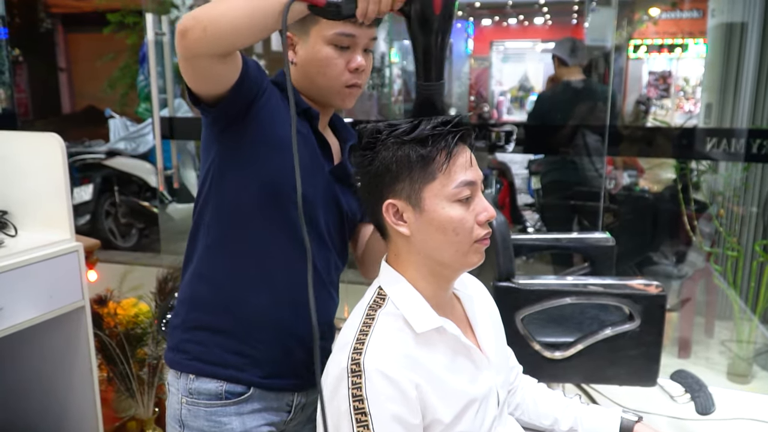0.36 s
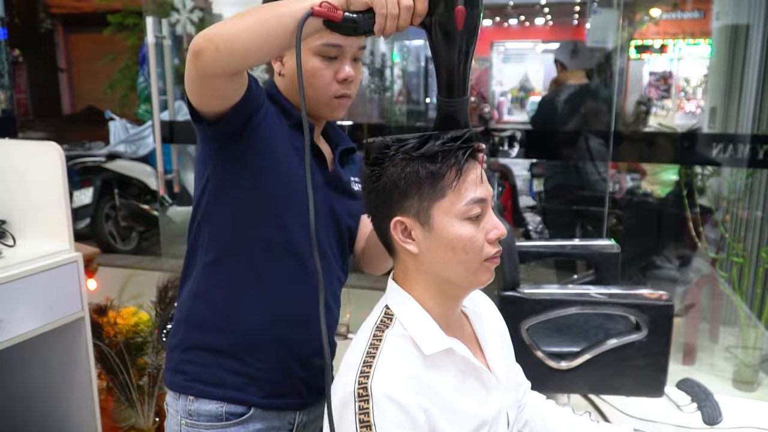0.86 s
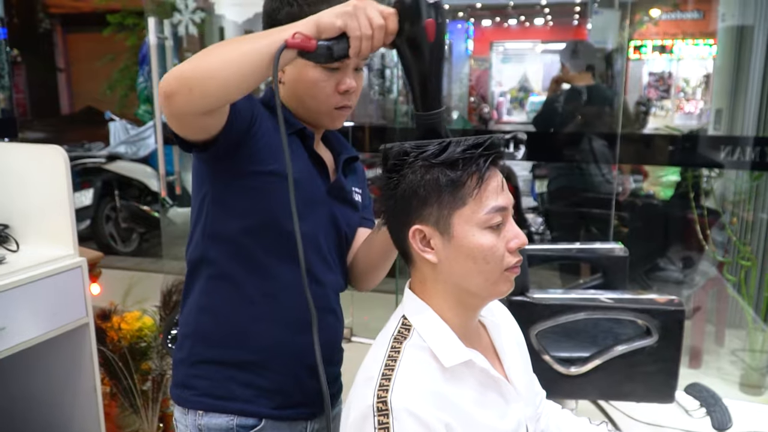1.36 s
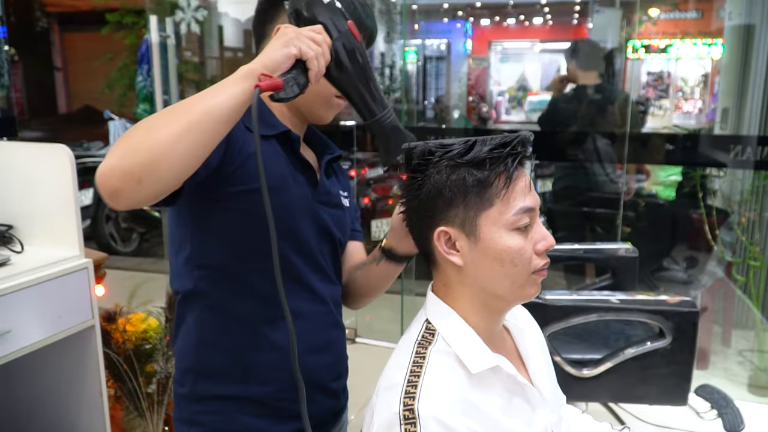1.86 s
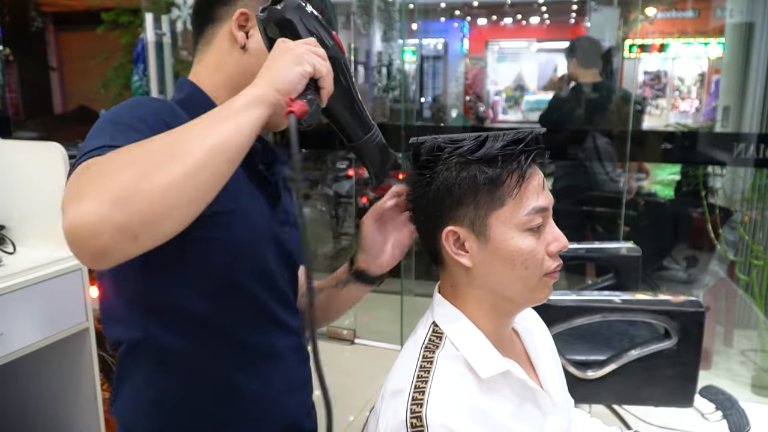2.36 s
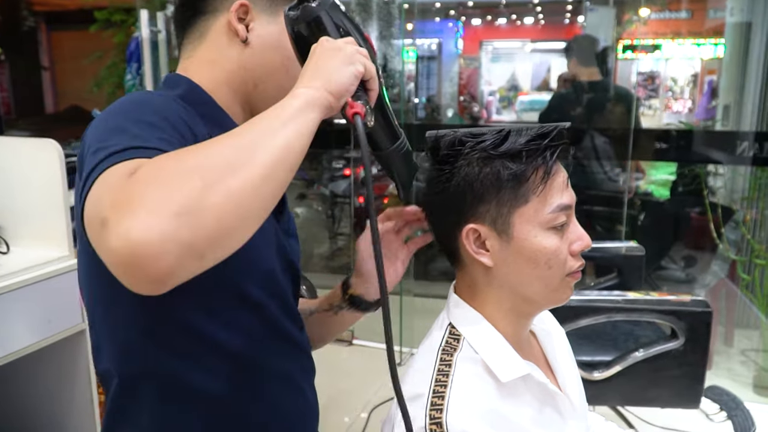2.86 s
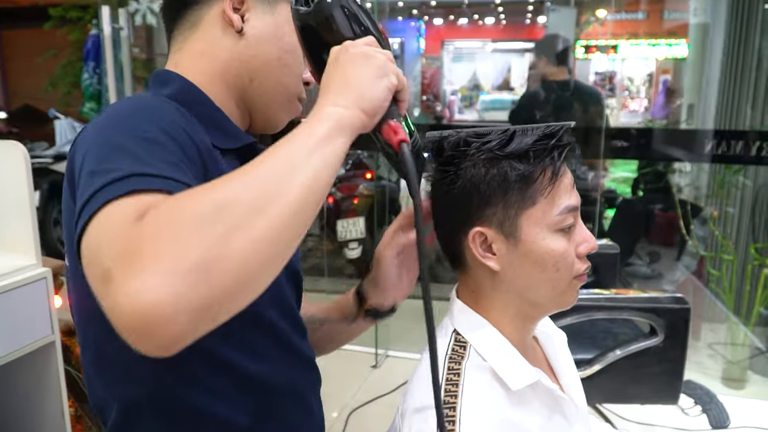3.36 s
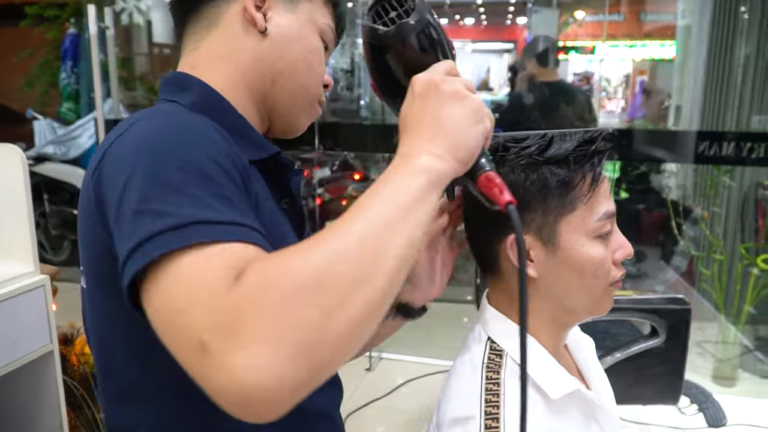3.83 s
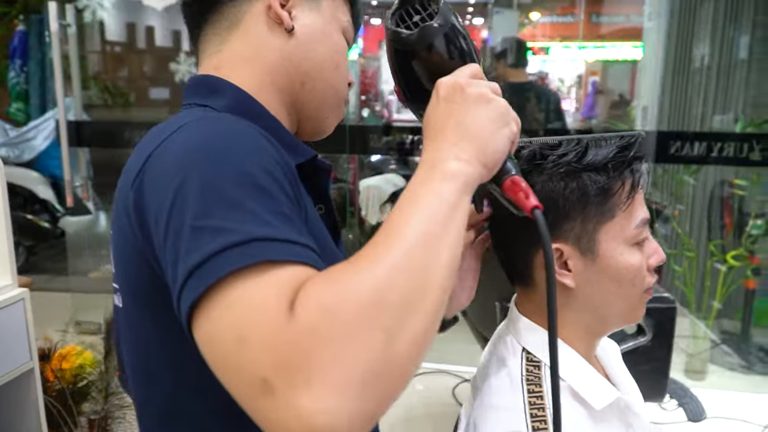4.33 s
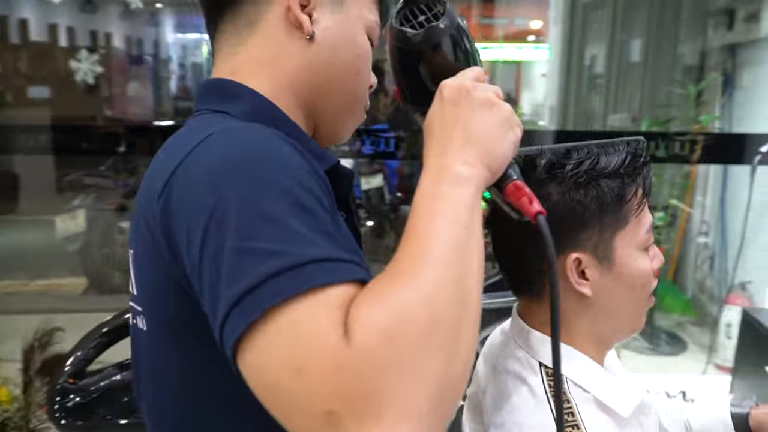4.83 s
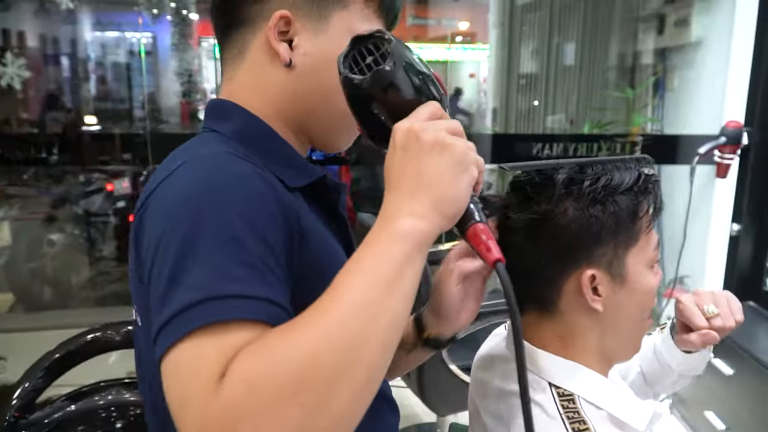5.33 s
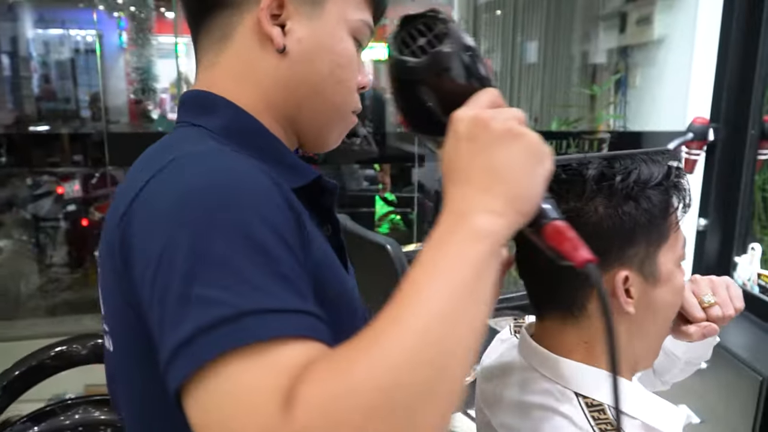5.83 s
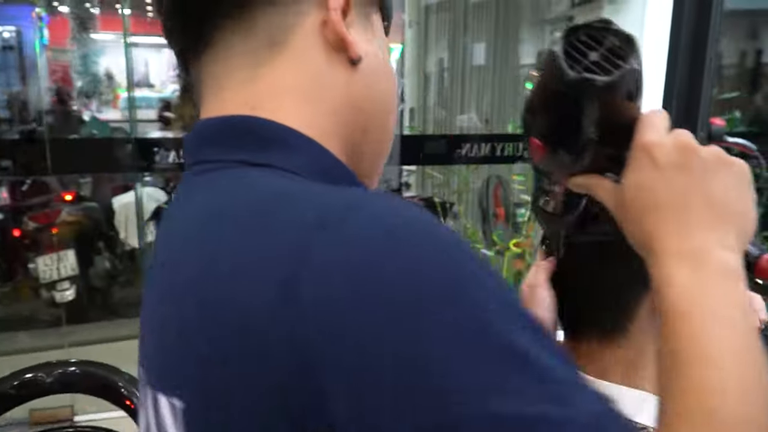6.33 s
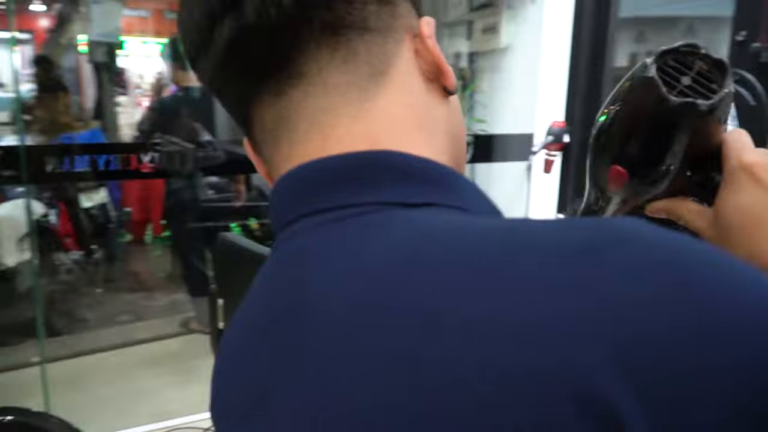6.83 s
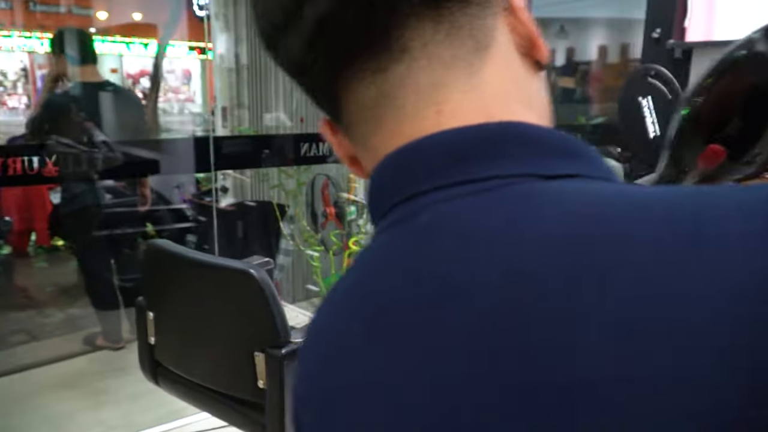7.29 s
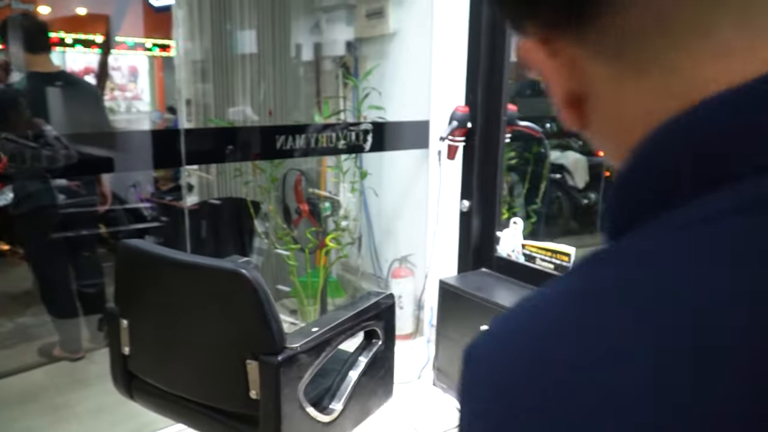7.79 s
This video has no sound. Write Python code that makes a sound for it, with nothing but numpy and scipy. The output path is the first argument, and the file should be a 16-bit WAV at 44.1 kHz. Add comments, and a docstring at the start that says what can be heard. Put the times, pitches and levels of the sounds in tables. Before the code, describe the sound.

Continuous close hair dryer roar with airy hiss and drifting whistly tones, growing louder then sliding right, plus a small steel clink near the start.

```python
"""A handheld hair dryer blows in a small tiled shop, comes nearer, then passes to the right of a close microphone pair.
Its rush is noise shaped by the barrel's pipe modes, with jet and grille hiss above and drifting modes that sing.
The shop returns it as reverberation, nearly mono in the low mids and widest around 1.5-3 kHz; the motor adds
faint tones. Two wavering hums and a traffic rumble come in from the street; decaying sines make one clink of a
steel tool."""
import sys
import numpy as np
from scipy import signal
from scipy.io import wavfile
from scipy.ndimage import uniform_filter1d, map_coordinates

SR = 44100
rng = np.random.default_rng(int(sys.argv[2]) if len(sys.argv) > 2 else 0)


def boost(x):
    """Linear amplitude factor 10**(x/20) for a level x in decibels (scalar or array-like)."""
    u = np.asarray(x, float) / 20
    return 10 ** u


def unload_wav(signal):
    """Save mono or channel-first audio to the path in sys.argv[1] as 16-bit WAV at rate SR, clipped to [-1, 1]."""
    wavfile.write(
        sys.argv[1],
        SR,
        np.round(np.clip(np.atleast_2d(signal).T, -1, 1) * 32767).astype(np.int16),
    )


N = 360297  # length in samples
WINDOW = 2048  # samples in each short-time spectrum
TOP_HZ = 15730  # the grille hiss and the reverberation end here

# the dryer's direct sound, before the shading at the microphones: start_s, barrel_db, jet_db, grille_db
DRYER_LEVELS = [(0, -30, -30, -34.5), (.9, -28, -29.5, -33.5), (1.6, -30, -32, -35.5),
                (2.1, -29, -31.5, -37), (2.7, -26.5, -30.5, -33.5), (3.1, -27, -29, -31.5),
                (3.6, -27, -26.5, -28.5), (4.2, -25, -25.5, -28.5), (5.1, -27.5, -26, -28.5),
                (5.9, -25, -24.5, -28), (6.3, -24, -24, -29.5), (6.7, -26.5, -25, -31), (7, -28, -26, -31),
                (7.3, -27, -28, -29.5), (7.55, -27, -26.5, -27.5), (7.8, -26.5, -28, -28.5),
                (8.17, -28.5, -33, -34)]


def along(points, hz):
    """(Hz, value) points read on a log frequency axis."""
    point_hz, value = np.transpose(points)
    return np.interp(np.log(hz + 1), np.log(point_hz + 1), value)


def curves(rows, t):
    """Each column after the time, read at times t."""
    start_s, *columns = np.transpose(rows)
    return [np.interp(t, start_s, column) for column in columns]


def wobble(rate):
    """A smooth random curve through rate knots a second."""
    knots = rng.standard_normal(int(N * rate / SR) + 4)
    return map_coordinates(knots, [np.arange(N) * rate / SR])


def patches(shape, bins, frames):
    """A random field of spread 1, smoothed over so many bins and frames."""
    field = uniform_filter1d(rng.standard_normal(shape), size=bins, axis=0)
    field = uniform_filter1d(field, size=frames, axis=1)
    return field / field.std()


def noise(patchy_db, flutter_db):
    """Short-time spectrum of turbulence: quick flutter, broad patches and the fine ripple of wall echoes."""
    # depth of the echo ripple: pitch_hz, depth_db
    ripple_depth = [(200, 1.5), (500, 2), (1000, 2.5), (2500, 2.5), (5000, 1.5), (12000, 1)]
    hiss = boost(flutter_db * wobble(30)) * rng.standard_normal(N)
    hz, t, spectrum = signal.stft(hiss, SR, nperseg=WINDOW)
    broad_db = patchy_db * patches(spectrum.shape, bins=9, frames=14)
    # echoes interfere: narrow peaks that shift with time
    ripple_db = along(ripple_depth, hz)[:, None] * patches(spectrum.shape, bins=1, frames=18)
    spectrum = spectrum * boost(broad_db + ripple_db)
    return hz[:, None], t, spectrum / np.sqrt(np.mean(abs(spectrum) ** 2))


def to_sound(spectrum):
    """Waveform of a short-time spectrum, trimmed to the scene's length."""
    return signal.istft(spectrum, SR, nperseg=WINDOW)[1][..., :N]


def peak(hz, centre_hz, width_hz):
    """Power response of one resonance, 1 at its centre."""
    return 1 / (1 + ((hz * hz - centre_hz ** 2) / (hz * width_hz + 1)) ** 2)


def level(power, db):
    """Gain that gives the noise this power spectrum at the rms level db."""
    # 3/4 is the share of the noise power that the windowed spectrum shows
    return boost(db) * np.sqrt(power / power.sum(axis=0) * 3 / 4)


def barrel(hz):
    """Power gain of the barrel's pipe modes on top of a flat rush."""
    # pipe modes: centre_hz, width_hz, over_rush_db
    pipe_modes = [(450, 190, -14.5), (1310, 210, -2.5), (1480, 140, -6), (2110, 240, -2.5), (2650, 100, -3),
                  (3290, 110, -2.5), (3900, 200, -8), (4450, 220, -4), (4950, 250, -19), (5960, 870, -1),
                  (9900, 600, -16)]
    return 1 + sum(boost(2 * db) * peak(hz, centre, width) for centre, width, db in pipe_modes)


def hollow(hz, t):
    """Gain of each microphone: as the dryer moves off, a hollow sweeps down at the right one and its top dulls."""
    # the right microphone's losses: start_s, hollow_hz, depth_db, top_lost_db
    right_losses = [(7.2, 10300, 0, 0), (7.4, 10100, 3, 2), (7.5, 9900, 7, 2.5), (7.6, 9600, 7, 3),
                    (7.75, 8900, 6, 3), (7.95, 8700, 4, 3), (8.17, 8500, 3, 3)]
    # where the top dulls: pitch_hz, share of the loss
    top_share = [(13000, 0), (15500, 1)]
    centre_hz, depth_db, top_db = curves(right_losses, t)
    lost_db = depth_db * peak(hz, centre_hz, width_hz=1700) + top_db * along(top_share, hz)
    return boost([0 * lost_db, -lost_db])


def modes(hz, widths_hz, columns):
    """Gains of drifting resonances, whose columns alternate centre Hz and level dB."""
    return [level(peak(hz, centre, width) ** 2, db)
            for width, centre, db in zip(widths_hz, columns[::2], columns[1::2])]


def dryer_gain(hz, t, lag_us):
    """Four rushes, of roar, body, jet and grille, and the singing modes, summed as powers."""
    # spectra of the four rushes (all but the grille then pass the barrel): pitch_hz, density_db per Hz
    roar_spectrum = [(30, -90), (100, -45), (170, -22.5), (250, -7), (310, -2.5), (400, -0.5), (700, -1.5),
                     (1000, -7.5), (1500, -60)]
    body_spectrum = [(500, -44), (750, -4), (1100, -0.5), (1500, -1.5), (1800, -5.5), (2150, -1.5),
                     (2500, -3.5), (3400, -5.5), (4500, -11.5), (6000, -58)]
    jet_spectrum = [(2500, -42), (3400, -6), (4500, 1.5), (6000, -0.5), (8500, 1.5), (10000, 0),
                    (12000, -34), (14000, -50)]
    grille_spectrum = [(7000, -38), (9500, -3), (11000, 1), (13000, -0.5), (15000, 0.5), (16500, -6)]
    # level of the low roar: start_s, level_db
    roar_level = [(0, -37.5), (1, -36.5), (1.7, -37.5), (2.7, -34.5), (4.3, -35.5), (5, -34.5),
                  (6.3, -32.5), (6.9, -33), (8.17, -35.5)]
    # three modes drift and swell as the mouth nears the hair: start_s, then pitch_hz, level_db of each
    singers = [(0, 475, -42, 1055, -48, 2700, -43), (1, 490, -37.5, 1055, -40, 2700, -44),
               (1.8, 473, -45.5, 1140, -40, 2740, -39), (2.6, 423, -39.5, 1095, -43, 2770, -42),
               (3.4, 420, -42, 1040, -37, 2720, -43), (4.2, 420, -48, 990, -43, 2720, -38),
               (5, 416, -33, 1010, -37, 2700, -34), (5.7, 415, -43, 1010, -39, 2700, -39),
               (6.3, 414, -44, 1005, -38, 2830, -35), (6.7, 418, -40, 1000, -33.5, 2720, -35),
               (7.2, 444, -40, 990, -37, 2770, -33), (7.6, 468, -39.5, 1030, -34, 2900, -35),
               (8.17, 453, -32.5, 1014, -36, 2900, -35)]
    # width_hz of each drifting mode, before its response is squared
    singer_widths = (32, 60, 520)
    # two barrel modes whistle as the mouth turns, the gap between them fills: start_s, then pitch_hz, level_db
    whistlers = [(0, 1520, -36, 1820, -39, 2130, -33), (.6, 1520, -36, 1820, -40, 2130, -37.5),
                 (.9, 1500, -39, 1840, -39, 2170, -35), (1.7, 1510, -35.5, 1810, -42, 2150, -37),
                 (2.4, 1540, -35, 1840, -40, 2130, -34), (3.1, 1510, -47, 1790, -40, 2170, -42),
                 (3.5, 1590, -35, 1820, -42, 2150, -37), (3.8, 1570, -31, 1820, -45, 2180, -31.5),
                 (4.2, 1480, -35.5, 1820, -48, 2150, -32.5), (4.55, 1510, -32, 1820, -48, 2200, -30),
                 (4.9, 1520, -30, 1820, -48, 2130, -35.5), (5.2, 1510, -31.5, 1820, -42, 2110, -32),
                 (5.55, 1550, -32.5, 1820, -34, 2110, -33), (5.9, 1520, -32, 1830, -36, 2190, -30.5),
                 (6.3, 1480, -30, 1820, -50, 2200, -39), (6.9, 1520, -34, 1830, -35, 2160, -34),
                 (7.3, 1500, -36, 1780, -38, 2170, -35), (7.8, 1510, -32.5, 1800, -37, 2130, -39),
                 (8.17, 1480, -34, 1820, -45, 2240, -42)]
    # width_hz of each whistling mode and of the gap, before the response is squared
    whistler_widths = (174, 340, 186)
    # three middle modes that swell with the mouth close to the head: pitch_hz, width_hz before squaring
    close_modes = [(1115, 45), (1212, 55), (1410, 130)]
    # their levels: start_s, then level_db of each
    close_levels = [(0, -52, -52, -44), (3.9, -52, -50, -47), (4.5, -52, -48, -35), (5, -50, -48, -30),
                    (5.4, -43, -41, -44), (5.8, -42, -41, -40), (6.2, -42, -37, -35), (6.45, -44, -45, -32),
                    (6.8, -52, -50, -42), (8.17, -52, -48, -42)]

    body_db, jet_db, grille_db = curves(DRYER_LEVELS, t)
    roar_db, = curves(roar_level, t)
    # the jet's hump climbs as the dryer passes to the side: 50 Hz a microsecond of lag
    hump_hz = np.minimum(6540 + 50 * lag_us, 7800)
    hump = 1 + boost(2 * 1.5) * peak(hz, hump_hz, width_hz=950)
    layers = [level(boost(2 * along(roar_spectrum, hz)) * barrel(hz), roar_db),
              level(boost(2 * along(body_spectrum, hz)) * barrel(hz), body_db),
              level(boost(2 * along(jet_spectrum, hz)) * barrel(hz) * hump, jet_db),
              level(boost(2 * along(grille_spectrum, hz)) * (hz < TOP_HZ), grille_db)]
    layers += modes(hz, singer_widths, curves(singers, t))
    layers += modes(hz, whistler_widths, curves(whistlers, t))
    layers += [level(peak(hz, centre, width) ** 2, db)
               for (centre, width), db in zip(close_modes, curves(close_levels, t))]
    return np.sqrt(sum(gain * gain for gain in layers))


def dryer():
    """Direct sound: one turbulent noise through the dryer's gain, shaded and delayed by its bearing."""
    # bearing, as extra path to the left microphone: start_s, lag_us
    bearing = [(0, 6), (.9, 8), (1.75, 2), (2.4, -1), (3.5, 0), (4.7, 6), (5.3, 2), (5.8, 3), (6.15, 12),
               (6.5, 22), (7, 34), (7.3, 36), (7.55, 53), (7.8, 58), (8.17, 66)]
    # shading of the left side: pitch_hz, left over right ahead_db, loss_db per microsecond,
    # turn_us (lag around which the loss turns back)
    shading = [(200, 0.5, 0.01, 110), (1520, -2, 0.07, 78), (4100, 2, 0.434, 66), (6000, 2.5, 0.2944, 67),
               (7500, -0.5, 0.4662, 51), (9300, 0.5, .5, 53), (11300, -0.5, 0.4, 51), (13500, 2, 0.57, 37),
               (15500, -6.5, 0.46, 41)]
    # share of the extra path that each wave feels: pitch_hz, share
    path_share = [(3000, 1.2), (5000, 0.92), (7500, 1.3), (10000, 1.23), (15000, 1)]

    hz, t, turbulence = noise(patchy_db=.6, flutter_db=.35)
    lag_us, = curves(bearing, t)
    # long waves bend round the microphone body, short ones are shaded
    shade_hz, *columns = np.transpose(shading)
    ahead_db, loss, turn_us = [along(np.transpose([shade_hz, column]), hz) for column in columns]
    pan_db = ahead_db - loss * lag_us / (1 + abs(lag_us / turn_us) ** 3.9)
    lag_s = lag_us / 10 ** 6 * along(path_share, hz)
    # half the difference goes to each side
    left = boost(pan_db / 2) * np.exp(-1j * np.pi * hz * lag_s)
    sides = np.array([left, 1 / left])
    return to_sound(dryer_gain(hz, t, lag_us) * turbulence * hollow(hz, t) * sides)


def shop():
    """The dryer's reverberation: nearly mono in the low mids, widest around 1.5-3 kHz, more alike again on top."""
    # spectrum before the barrel: pitch_hz, density_db per Hz
    shop_spectrum = [(30, -90), (100, -40), (170, -36), (300, -6.5), (500, -2), (1000, 2), (2000, -1.5),
                     (4000, -3.5), (8000, -3.5), (12000, -7), (16000, -11)]
    # likeness of the two microphones: pitch_hz, left-right correlation
    likeness = [(100, 0.9), (300, 0.97), (700, 0.69), (1500, 0.15), (3000, 0.12), (7000, 0.29),
                (15000, 0.6)]
    # level, with a duller spell as the barber's back screens the pair: start_s, level_db, treble_lost_db
    shop_level = [(0, -27.5, 0.5), (2, -27.5, 1), (4, -27, -1), (6, -27.5, -0.5), (6.8, -27.5, 3),
                  (7.3, -26, 0), (7.55, -27.5, 1), (7.9, -27, 0), (8.17, -28, 1)]
    # where the treble is lost: pitch_hz, share of the loss
    screened = [(5000, 0), (8000, 1)]

    hz, t, first = noise(patchy_db=.8, flutter_db=.2)
    _, _, second = noise(patchy_db=.8, flutter_db=.2)
    # the mix of shared and opposed noise sets the correlation
    turn = np.arccos(np.clip(along(likeness, hz), -1, 1)) / 2
    mid, side = np.cos(turn) * first, np.sin(turn) * second
    shop_db, lost_db = curves(shop_level, t)
    power = boost(2 * along(shop_spectrum, hz)) * barrel(hz) * (hz < TOP_HZ)
    gain = level(power, shop_db - along(screened, hz) * lost_db)
    return to_sound(gain * hollow(hz, t) * np.array([mid + side, mid - side]))


def tone(hz, wander_hz, sway_db):
    """A sine of rms about 1, unsteady in pitch and level."""
    sway = boost(sway_db * wobble(6))
    phase = 2 * np.pi * np.cumsum(hz + wander_hz * wobble(6)) / SR
    return np.sqrt(2) * sway * np.sin(phase)


def nearness(t):
    """Barrel level over that at middle distance, dB."""
    middle_distance_db = -27
    return curves(DRYER_LEVELS, t)[0] - middle_distance_db


def motor():
    """Faint whine, louder as the dryer nears, and two housing tones; in phase, slightly louder at the right."""
    # whine, before nearness and the microphone gain: pitch_hz, level_db, wander_hz
    whine_tones = [(328, -55, 2), (419, -57, 2.5), (492, -53, 3), (995, -51, 3), (2952, -56, 3),
                   (3284, -55, 6)]
    # pitch_hz of the two housing tones
    housing_hz = (735, 779)
    # housing tones, before the microphone gain: start_s, lower_db, upper_db
    housing_levels = [(0, -47, -50), (.7, -45, -49), (1.1, -51, -48), (1.8, -56, -52), (2.3, -54, -47),
                      (3.2, -58, -46), (4.3, -58, -42.5), (4.9, -58, -44), (5.7, -58, -47), (6, -58, -41),
                      (6.4, -56, -41), (6.6, -54, -46), (6.9, -54, -44), (7.3, -54, -44), (7.7, -54, -50),
                      (8.17, -54, -48)]
    t = np.arange(N) / SR
    whine = sum(boost(db) * tone(hz, wander, sway_db=4.0) for hz, db, wander in whine_tones)
    housing = sum(boost(db) * tone(hz, wander_hz=1.2, sway_db=1.2)
                  for hz, db in zip(housing_hz, curves(housing_levels, t)))
    tones = boost(nearness(t) + 0.5) * whine + housing
    return tones * boost([[-.6], [.6]])  # left, right dB


def hums():
    """Two low wavering tones over the rumble of traffic, alike at both microphones."""
    # traffic rumble: pitch_hz, density_db per Hz
    rumble_spectrum = [(20, -30), (45, -21), (80, -4), (100, -2), (150, -2), (200, -12), (400, -50)]
    # street sounds swell and pass: start_s, lower_hum_db, upper_hum_db, rumble_db
    street_levels = [(0, -77, -77, -85), (1.5, -81, -81, -80), (1.9, -84, -84, -74), (3.3, -73, -73, -70),
                     (4.3, -73, -73, -65), (4.8, -67, -69, -62), (5.25, -59, -67, -63),
                     (5.7, -59.5, -61, -63), (5.85, -64, -58, -63), (6, -56, -57, -63),
                     (6.15, -68, -58, -63), (6.35, -70, -70, -63), (7.1, -67, -63, -64),
                     (7.3, -64, -72, -65), (7.5, -65, -58, -65), (7.7, -66, -67, -68),
                     (8.17, -75, -68, -63)]
    # pitch_hz of the two hums
    hum_hz = (99, 115.5)
    hz, t, turbulence = noise(patchy_db=2.0, flutter_db=3.5)
    rumble_db = curves(street_levels, t)[2]
    rumble = to_sound(level(boost(2 * along(rumble_spectrum, hz)), rumble_db) * turbulence)
    lower_db, upper_db, _ = curves(street_levels, np.arange(N) / SR)
    return rumble + sum(boost(db) * tone(pitch, wander_hz=1.4, sway_db=1)
                        for pitch, db in zip(hum_hz, (lower_db, upper_db)))


def clink():
    """Each touch of the steel stops the old ring and starts the modes anew; it comes from the left."""
    # modes, before the level of each touch: pitch_hz, level_db, t60_s
    steel_modes = [(4150, 0, .22), (7181, 0, .06), (8786, -3, .08)]
    # touches, as at the left microphone: start_s, low_mode_db, high_modes_db
    touches = [(.799, -22, -29), (.809, -25, -20.5), (.825, -40, -40), (.832, -23.5, -29), (.845, -23, -31),
               (.857, -36, -36)]
    out, t = np.zeros(N), np.arange(SR // 4) / SR
    onset = 1 - np.exp(-t / .002)
    low, middle, high = [boost(db - 60 * t / t60) * np.sin(2 * np.pi * hz * t) * onset
                         for hz, db, t60 in steel_modes]
    for start_s, low_db, high_db in touches:
        ring = boost(low_db) * low + boost(high_db) * (middle + high)
        out[round(start_s * SR):][:len(t)] = ring
    return out * boost([[0], [-4]])  # left, right dB


def scene():
    """All sources at the microphone pair."""
    return dryer() + shop() + motor() + hums() + clink()


def band_limit(x):
    """A steep low-pass at the top of the band."""
    return signal.sosfilt(signal.butter(12, 17070, fs=SR, output="sos"), x)


def record(dry):
    """The finished stereo mix, as it is stored."""
    return band_limit(dry)


dry = scene()
out = record(dry)
unload_wav(out)
```